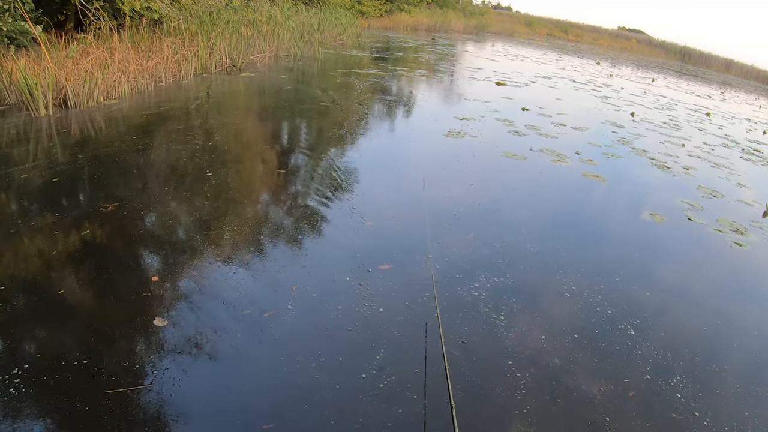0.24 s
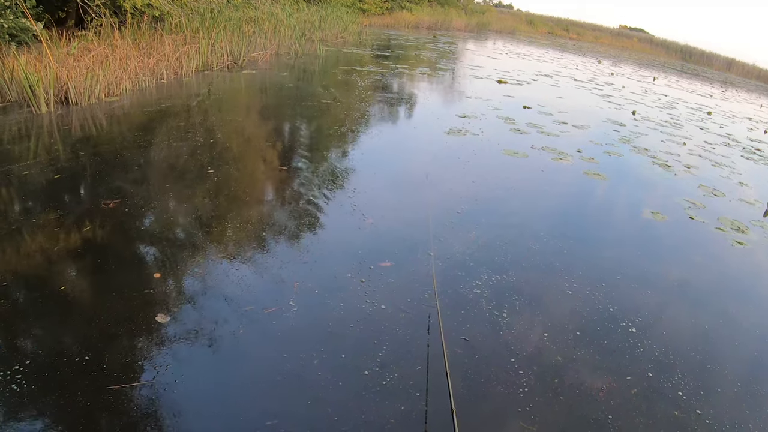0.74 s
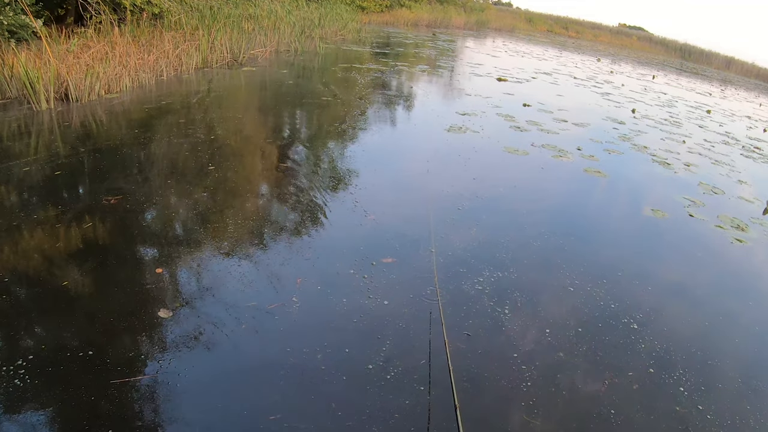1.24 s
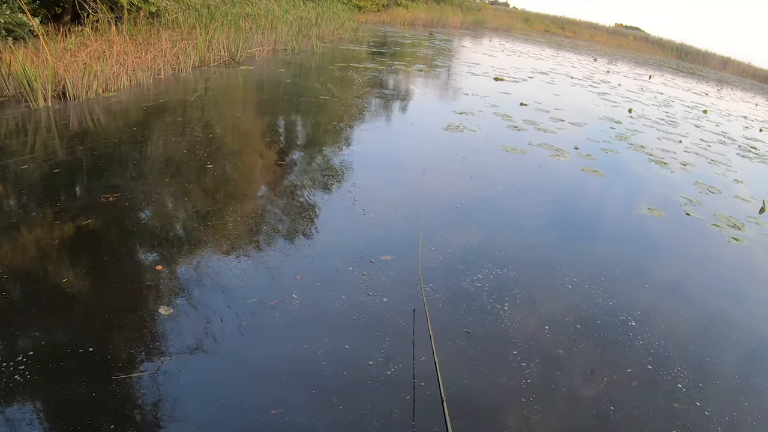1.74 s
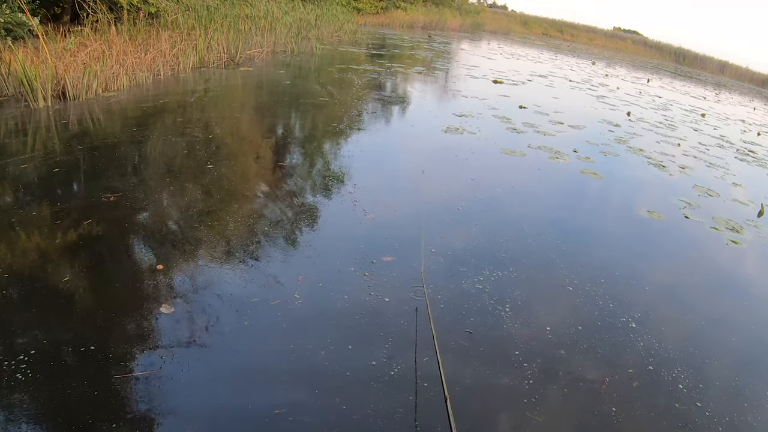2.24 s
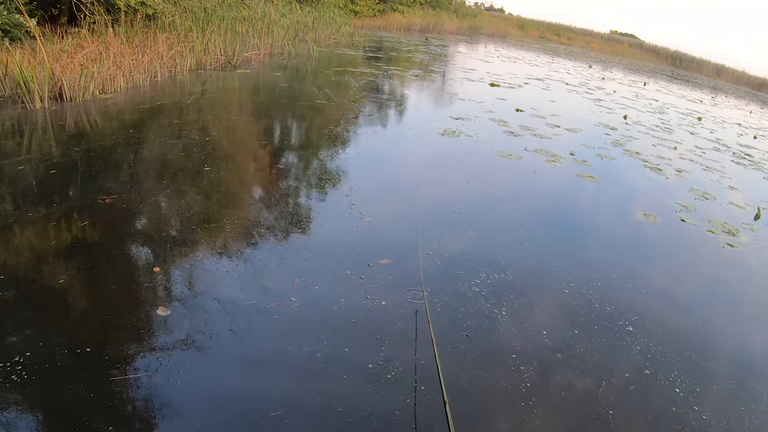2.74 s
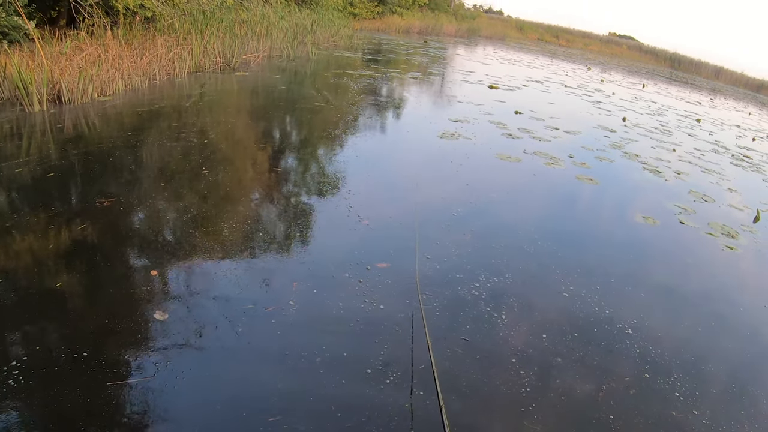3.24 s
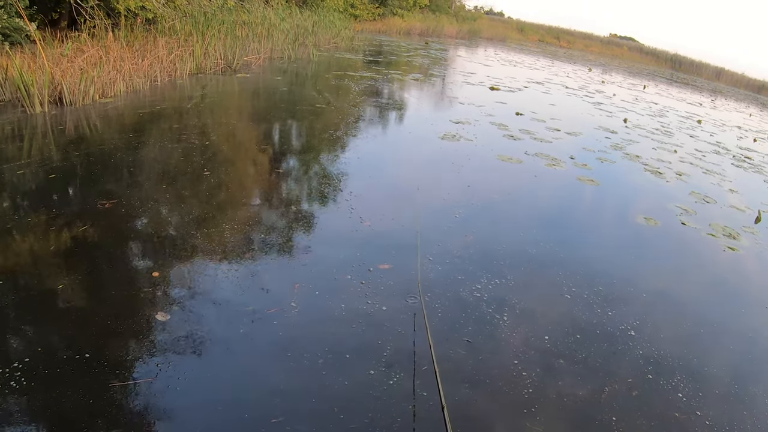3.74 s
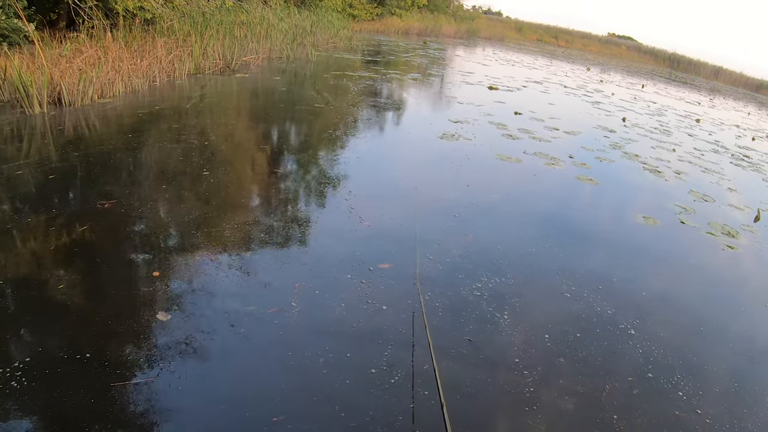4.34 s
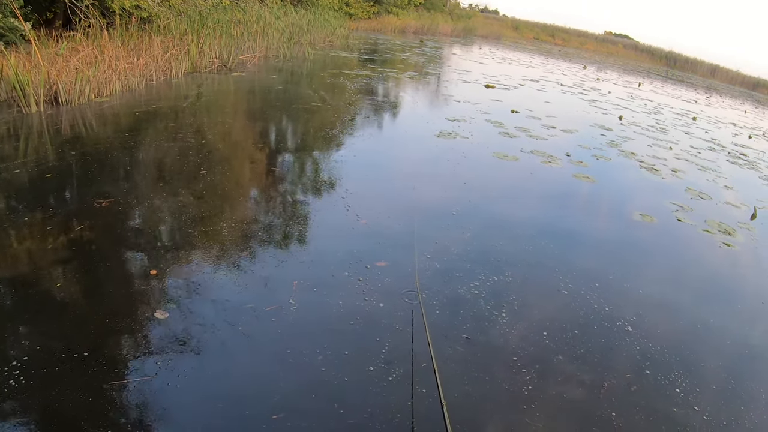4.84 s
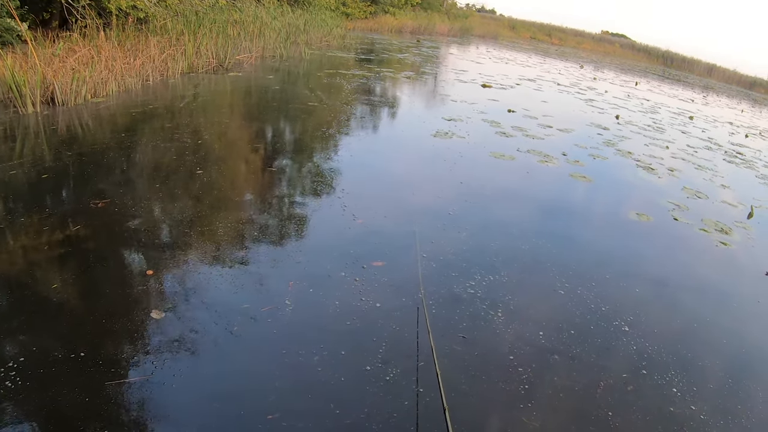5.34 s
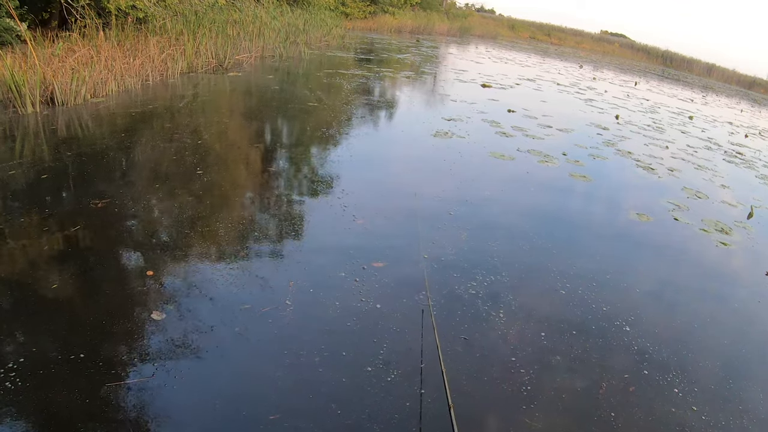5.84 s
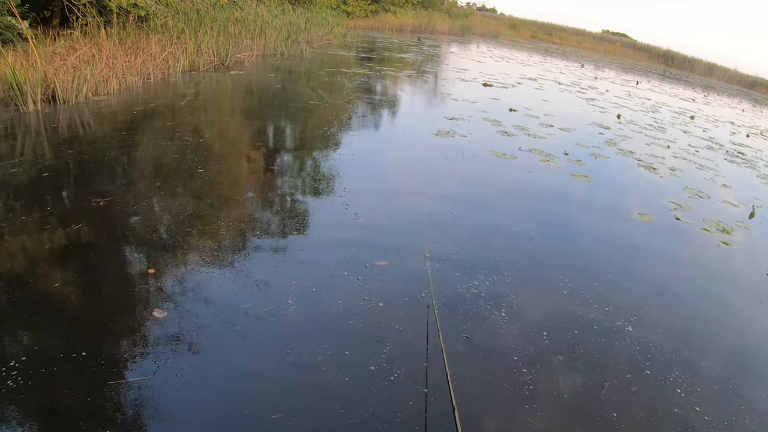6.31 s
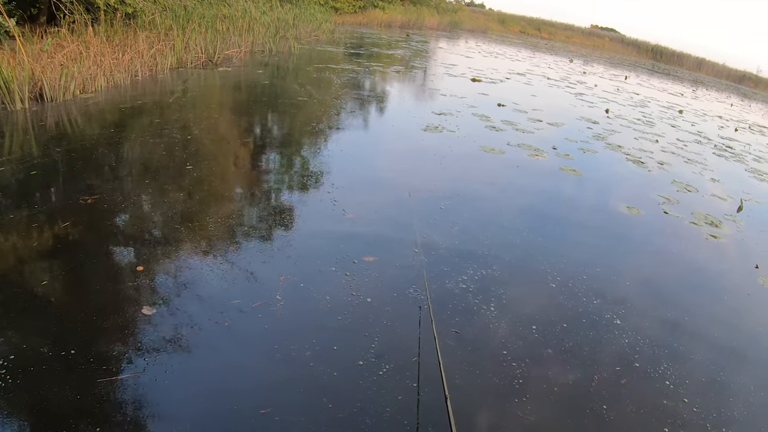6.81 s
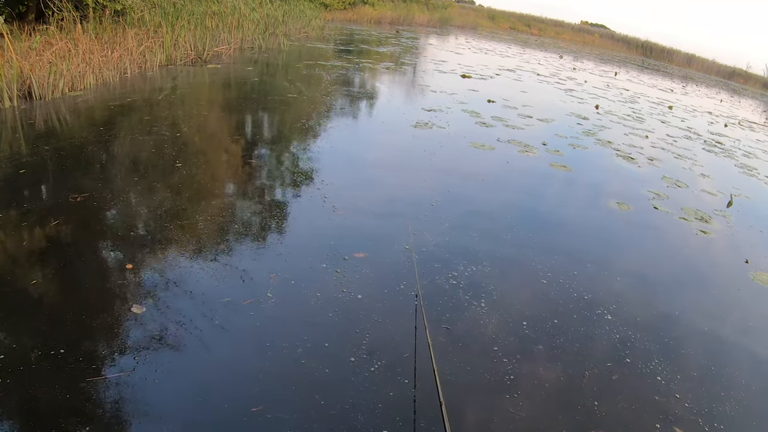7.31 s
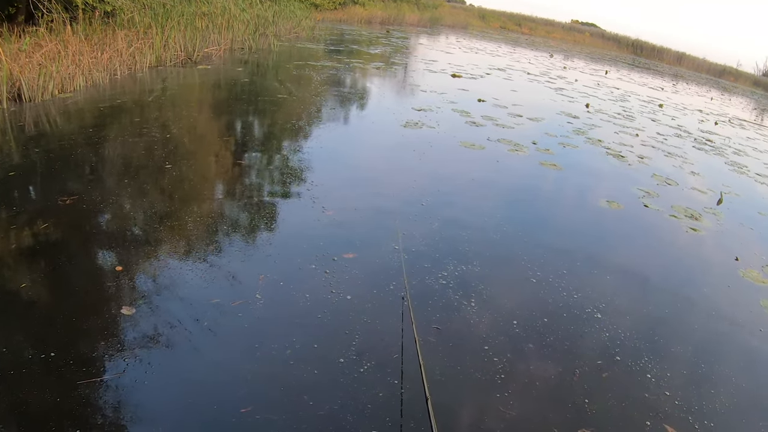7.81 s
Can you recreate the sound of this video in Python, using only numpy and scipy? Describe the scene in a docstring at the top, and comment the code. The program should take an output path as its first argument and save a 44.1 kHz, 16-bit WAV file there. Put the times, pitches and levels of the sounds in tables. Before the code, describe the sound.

Evening marsh insects shimmer and chirp steadily, a rasping falling call recurs, frog peeps and bird chips dot the calm, and wind briefly buffets the left.

```python
"""Evening marsh from the water.

Ground crickets trill without pause over two noise bands of far insects. Bush crickets, a mole cricket
and a falling, pulsed chirp are wing-stroke-gated tones, scattered by reeds and trees. Frog peeps and bird
chips are swept sines; a bird's scolds are shaped noise, tackle ticks band-passed bursts.
Far traffic, a machine hum and breeze lie behind; one puff of wind hits the left microphone port.
"""
import sys
import numpy as np
from scipy import signal
from scipy.fft import rfft, irfft, next_fast_len
from scipy.io import wavfile

SR = 44100
rng = np.random.default_rng(int(sys.argv[2]) if len(sys.argv) > 2 else 0)


def wrap_up_sound(samples):
    """Save the sound to the file named by the first command line argument, as 16-bit audio."""
    columns = np.atleast_2d(samples).T
    # keep every value between -1 and 1, then stretch to whole-number steps
    tamed = np.clip(columns, -1, 1)
    steps = np.round(tamed * 32767).astype(np.int16)
    wavfile.write(sys.argv[1], SR, steps)


N = 355875
T = np.arange(N) / SR
TOP_HZ = 9700

# pan_db is left minus right; echo_db is scatter relative to the direct sound

# ground cricket trills: strokes_per_s, top_pitch_hz, stroke_end_sag_hz, level_db, pan_db, echo_db
GROUND_TRILLS = [(40.9, 8370, 700, -54.5, 4.5, -8.5), (39.37, 7888, 70, -54, 2, -1),
                 (39.75, 8350, 200, -60.5, -1.5, -1), (32, 6720, 400, -57, 0, 0.5),
                 (46.9, 5270, 160, -65.5, 3, 4)]

# bush crickets by name: pitch_hz, start_rise_hz, length_s, pan_db, echo_db
BUSH_SINGERS = {"high": (4860, 70, .28, 7.9, -6), "left": (4480, 10, .33, 6, -6),
                "ahead": (4515, 25, .32, 2.3, -5), "low": (4390, 60, .29, 1, 1),
                "back": (4580, 50, .29, 1, 1), "gruff": (4190, 250, .16, 1, 3)}
# bush cricket chirps: start_s, singer, level_db
BUSH_CHIRPS = [(.04, "low", -56), (.731, "ahead", -47.5), (1.27, "gruff", -61), (1.47, "high", -49),
               (1.899, "low", -51.5), (2.102, "back", -52), (2.41, "left", -48), (2.99, "gruff", -56),
               (3.12, "high", -49.5), (3.219, "low", -52), (3.35, "back", -55), (3.66, "left", -55),
               (4.12, "back", -54), (4.35, "ahead", -50), (4.689, "low", -52.5), (4.91, "high", -51.5),
               (5.202, "back", -56), (5.419, "left", -55.5), (5.779, "left", -61), (6.15, "ahead", -52),
               (6.24, "low", -52.5), (6.41, "back", -59), (6.78, "ahead", -54.5), (7.19, "left", -54),
               (7.551, "back", -53.5), (7.84, "left", -54)]
CHIRP_RISE_S, CHIRP_HZ_PER_STROKE_RATE = .06, 104
# fainter bush crickets deep in the reeds, at random
DEEP_GAP_S, DEEP_LENGTH_S, DEEP_HZ, DEEP_SPREAD_HZ, DEEP_DB, DEEP_PAN_DB = .9, .24, 4450, 120, -61.5, 1

# falling chirps: start_s, level_db
FALLING_CHIRPS = [(0.103, -54.5), (0.873, -52.5), (1.575, -53), (2.462, -54.5), (3.268, -53.7),
                  (4.093, -54.5), (5.03, -55.5), (5.9, -54.5), (6.994, -54.5), (7.79, -55)]
# the glide is fast at first; a lower note sets in under its end
FALL_LENGTH_S, FALL_START_HZ, FALL_END_HZ, FALL_BEND = .28, 3620, 2800, .66
LAST_DELAY_S, LAST_LENGTH_S, LAST_START_HZ, LAST_END_HZ = .212, .095, 2680, 2600
LAST_DB, FALL_PAN_DB = -1, .5
TREE_DELAY_S, TREE_ECHO_DB = .04, -5

# mole cricket, a nearly even beat with fainter answers: start_s, level_db
MOLE_CHIRPS = [(-.03, -59), (.37, -67), (.98, -56.5), (1.4, -66.5), (1.75, -57), (2.56, -60), (3.16, -66),
               (3.39, -60.5), (3.72, -69), (4.269, -59.5), (4.76, -68), (5.14, -60), (5.38, -66),
               (5.92, -59.5), (6.52, -66), (6.83, -59), (7.25, -68), (7.62, -59)]
MOLE_LENGTH_S, MOLE_HZ, MOLE_PAN_DB = .21, 1752, 7

# frog, two bouts of four: start_s, level_db
FROG_PEEPS = [(1.35, -60), (1.617, -58.5), (1.91, -59), (2.185, -60.5), (5.505, -62), (5.777, -59.5),
              (6.065, -58), (6.345, -60.5)]
PEEP_LENGTH_S, PEEP_HZ, PEEP_SLIDE_HZ, PEEP_SLIDE_S, PEEP_DROOP_HZ = .12, 2660, 319, .0172, 45

# single bird chips: start_s, length_s, start_hz, end_hz, hoarseness_hz, level_db, pan_db
BIRD_CHIPS = [(0.804, 0.028, 3060, 3240, 200, -52, -3), (2.531, .008, 3750, 2870, 120, -42, 0),
              (3.0, 0.028, 2930, 2960, 50, -58.5, -6), (3.738, 0.038, 8200, 7720, 160, -42.5, 7),
              (4.324, 0.0325, 3030, 3600, 262, -43.5, -5), (7.492, 0.012, 3800, 3720, 110, -47, 8),
              (7.682, 0.028, 3140, 3100, 240, -47, -3)]
# one quick run of rising chips
RUN_S, RUN_PERIOD_S, RUN_START_HZ, RUN_END_HZ, RUN_DB, RUN_PAN_DB = 6.88, .11, 4600, 5560, -54.5, 1
RUN_CHIP_S, RUN_HOARSE_HZ = .036, 230

# paired arched notes, right bank: start_s, level_db
NOTE_PAIRS = [(.374, -60), (1.712, -59), (3.078, -58), (4.106, -57.5), (5.918, -58), (7.468, -50.5)]
PAIR_GAP_S, ARCH_LENGTH_S, PAIR_PAN_DB = .103, .037, -20
ARCH_START_HZ, ARCH_TOP_HZ, ARCH_TOP_S = 2450, 3920, .022
# scolds of the same bird: start_s, length_s, level_db
BIRD_SCOLDS = [(.61, 0.15, -54), (1.885, 0.14, -52), (4.35, .145, -53), (6.14, 0.15, -55.5)]
# scold spectrum: frequency_hz, relative_level_db_per_hz
SCOLD_SPECTRUM = [(1500, -27), (2100, -8.5), (2600, -3.5), (3000, -1), (3500, -4.5), (4200, -9),
                  (5200, -27.5)]
SCOLD_PAN_DB = -7

# tackle ticks and knocks: start_s, level_db, low_edge_hz, high_edge_hz, decay_s, pan_db
TACKLE_TICKS = [(0.701, -51, 1500, 3000, 0.002, -13), (1.724, -52, 2000, 5200, .002, 1),
                (2.431, -43.5, 430, 1050, 0.006, -9), (3.22, -50.5, 5000, 6160, .003, 0),
                (4.214, -55, 800, 3000, .002, -8), (6.197, -44.5, 1200, 3300, 0.0009, -10),
                (7.197, -47, 750, 2100, .002, -14), (7.413, -57, 1600, 2200, .002, 2.5)]

# far insect chorus spectra: frequency_hz, relative_level_db_per_hz
CRICKET_SPECTRUM = [(1500, -26.5), (2100, -19), (3300, -16.5), (3700, -14), (3980, -6.5), (4400, -0.5),
                    (4620, -3), (4800, -10), (5100, -10.5), (5700, -33.5)]
# frequency_hz, relative_level_db_per_hz
KATYDID_SPECTRUM = [(5300, -22), (5750, -14), (6000, -7), (6250, -3), (6600, -3.5), (7000, -4),
                    (7400, -4.5), (7700, -4), (8300, -14), (8500, -27.5), (9000, -40)]

# traffic rumble spectrum: frequency_hz, relative_level_db_per_hz
RUMBLE_SPECTRUM = [(15, -29.5), (30, -17), (45, -11.5), (62, 0.5), (90, -3), (115, -4), (150, -1.5),
                   (220, -9), (260, -17), (340, -20), (420, -32), (600, -53.5), (2000, -82)]
# traffic level: time_s, level_db
TRAFFIC_LEVEL = [(0, -32.5), (.9, -34), (1.4, -34), (2.5, -32), (3.6, -33.5), (4.3, -32), (5, -33),
                 (6.2, -33), (7, -33.5)]
# far machine hum partials: frequency_hz, peak_db
HUM_PARTIALS = [(60, -47.5), (295, -54), (356, -56)]
HUM_RISE_S, HUM_RISEN_S, HUM_LULL_DB = 3.5, 4.1, -2.5
# air in the far trees, spectrum: frequency_hz, relative_level_db_per_hz
AIR_SPECTRUM = [(30, 7), (150, 10.5), (300, 6), (450, -1.5), (580, -2), (790, 5), (1000, -3.5), (1300, -4),
                (1600, -7), (2100, -13.5), (3400, -16.5), (5500, -12.5), (8500, -18), (9300, -37),
                (11000, -49)]
BREEZE_DB, BREEZE_LULL_DB, BREEZE_STEP_S = -48, -1.6, 1.6

# wind on the microphone, spectrum: frequency_hz, relative_level_db_per_hz
WIND_SPECTRUM = [(10, -8), (25, -2.5), (45, -2.5), (80, -4.5), (130, -12), (250, -41.5), (600, -78.5)]
STIR_DB, STIR_PAN_DB = -51.5, 2.5
PUFF_S, PUFF_ATTACK_S, PUFF_HOLD_S, PUFF_RELEASE_S, PUFF_DB, PUFF_PAN_DB = 4.858, .21, .22, .19, -23.5, 14.5
WAKE_S, WAKE_DB = .7, -30.5


def undb(db):
    """Decibels to gain."""
    return 10 ** (np.asarray(db) / 20)


def unit(x):
    """Scale each channel to rms 1."""
    return x / np.sqrt(np.mean(x ** 2, axis=-1, keepdims=True))


def pan(db):
    """Left and right gains of constant power."""
    gains = undb(np.array([[db], [-db]]) / 2)
    return gains / np.sqrt(np.mean(gains ** 2))


def walk(rate_hz, size=N):
    """Random values joined by straight lines, with a spread near 1."""
    knots = rng.standard_normal(int(size / SR * rate_hz) + 2)
    return 1.2 * np.interp(np.arange(size) / SR * rate_hz, np.arange(len(knots)), knots)


def noise(spectrum, correlation):
    """Stereo noise of a given spectrum and left-right correlation, each channel at rms 1."""
    hz, db = np.transpose(spectrum)
    size = next_fast_len(N)
    bins_hz = np.arange(size // 2 + 1) * SR / size
    colour = undb(np.interp(np.log(bins_hz + 1), np.log(hz), db))
    white = rng.standard_normal((2, size))
    mid, side = irfft(rfft(white) * colour, size)[:, :N]
    c = np.clip(correlation, -1, 1)
    return unit(np.sqrt(1 + c) * mid + np.sqrt(1 - c) * side * np.array([[1], [-1]]))


def cycles(hz):
    """Turns completed at a changing frequency."""
    return np.cumsum(hz) / SR


def tone(hz):
    """A sine at a changing frequency."""
    return np.sin(2 * np.pi * cycles(hz))


def arch(u):
    """Half a sine between 0 and 1, silent outside."""
    return np.maximum(np.sin(np.pi * np.clip(u, 0, 1)), 0)


def progress(length_s):
    """0 to 1 over a call."""
    return np.linspace(0, 1, int(length_s * SR))


def ramp(start_s, length_s):
    """0 before the start, then a linear rise to 1."""
    return np.clip((T - start_s) / length_s, 0, 1)


def add(out, start_s, sound):
    """Mix a sound in; it may have begun before the scene."""
    start = int(start_s * SR)
    part = sound[:, max(-start, 0):max(N - start, 0)]
    start = max(start, 0)
    out[:, start:start + part.shape[1]] += part


def wings(hz, rate_hz, duty, sag_hz, rough, uneven=.006, skew=1):
    """Each closing stroke drags a scraper over a file; pitch sags where the wing is slow, skew > 1 peaks late."""
    size = len(hz)
    phase = cycles(rate_hz * (1 + uneven * walk(12, size))) % 1
    stroke = phase / np.clip(duty, .1, 1)
    speed = arch(stroke ** skew)
    # uneven teeth roughen the pitch
    pitch_hz = hz - sag_hz * (1 - speed) + rough * hz * walk(500, size)
    stroke_gain = undb(1.1 * walk(rate_hz, size))
    return np.sqrt(speed) * stroke_gain * tone(pitch_hz)


def reeds(x, echo_db, t60_s):
    """Direct sound plus dense scatter from reeds and trees, different at each port; energy kept at rms 1."""
    t = np.arange(int(SR / 2)) / SR
    scatter = unit(rng.standard_normal((2, len(t))) * np.exp(-np.log(1000) * t / t60_s))
    response = scatter * undb(echo_db) / np.sqrt(len(t))
    response[:, 0] += 1
    y = signal.fftconvolve(x[None], response, axes=1)
    return y / np.sqrt(np.sum(y ** 2, axis=1, keepdims=True) / len(x))


def ports(x, pan_db, lag_samples):
    """A source off to the side is louder at one port; the right port hears it later by the lag."""
    return np.array([x[0], np.roll(x[1], lag_samples)]) * pan(pan_db)


def ground_crickets():
    """Unbroken fast trills; each wing stroke is a little arch in pitch."""
    out = 0
    for rate_hz, hz, sag_hz, db, pan_db, echo_db in GROUND_TRILLS:
        pitch_hz = hz * (1 + .0022 * walk(8))
        song = wings(pitch_hz, rate_hz, duty=.55, sag_hz=sag_hz, rough=.002984, skew=1.7)
        scattered = reeds(song, echo_db, t60_s=.18)[:, :N]
        out = out + ports(scattered, pan_db, lag_samples=2) * undb(db)
    return out


def bush_chirp(hz, rise_hz, length_s, pan_db, echo_db):
    """Uneven strokes climb to pitch and tail off; a faster wing raises both pitch and stroke rate."""
    u = progress(length_s)
    drift = 1 + .002 * walk(25, len(u))
    pitch_hz = hz * drift - rise_hz * np.exp(-u * length_s / CHIRP_RISE_S)
    rate_hz = hz / CHIRP_HZ_PER_STROKE_RATE
    song = wings(pitch_hz, rate_hz, duty=.66, sag_hz=110, rough=.006, uneven=.05) * arch(u ** .9) ** .2
    return ports(reeds(song, echo_db, t60_s=.7), pan_db, lag_samples=round(pan_db / 4.5))


def bush_crickets():
    """Six singers near by, fainter ones at random; deeper in the reeds means more scatter and no clear side."""
    out = np.zeros((2, N))
    for start_s, singer, db in BUSH_CHIRPS:
        add(out, start_s, bush_chirp(*BUSH_SINGERS[singer]) * undb(db))
    for k, (when, detune) in enumerate(rng.uniform(size=(9, 2))):
        hz = DEEP_HZ + DEEP_SPREAD_HZ * (2 * detune - 1)
        chirp = bush_chirp(hz, 90, DEEP_LENGTH_S, DEEP_PAN_DB, echo_db=.5)
        add(out, (k + when / 2) * DEEP_GAP_S, chirp * undb(DEEP_DB))
    return out


def from_ahead(song):
    """A far call from straight ahead, nearly the same at both ports; the tree line answers a moment later."""
    out = np.zeros((2, len(song) + SR))
    for delay_s, db, t60_s, width in [(0, 0, .25, .12), (TREE_DELAY_S, TREE_ECHO_DB, .7, .22)]:
        mid, side = reeds(song, echo_db=-1, t60_s=t60_s)
        add(out, delay_s, (mid + width * side * np.array([[1], [-1]])) * undb(db))
    return out * pan(FALL_PAN_DB)


def falling_chirps():
    """Rasping pulses sweep down about half an octave in all, ending on a few slower, purer low pulses."""
    out = np.zeros((2, N))
    u, v = progress(FALL_LENGTH_S), progress(LAST_LENGTH_S)
    glide_hz = FALL_START_HZ + (FALL_END_HZ - FALL_START_HZ) * u ** FALL_BEND
    last_hz = LAST_START_HZ + (LAST_END_HZ - LAST_START_HZ) * v
    for start_s, db in FALLING_CHIRPS:
        rate_hz = 60 + 2 * rng.standard_normal()
        glide = wings(glide_hz, rate_hz, duty=.8, sag_hz=150.1, rough=.036) * arch(u ** .85) ** .36
        last = wings(last_hz, 31, duty=.8, sag_hz=114, rough=.014) * arch(v) ** .11
        add(out, start_s, from_ahead(glide) * undb(db))
        add(out, start_s + LAST_DELAY_S, from_ahead(last) * undb(db + LAST_DB))
    return out


def mole_cricket():
    """Low, burry chirps from the left bank, each stroke a small sweep, blurred by distance."""
    out = np.zeros((2, N))
    u = progress(MOLE_LENGTH_S)
    for start_s, db in MOLE_CHIRPS:
        song = wings(MOLE_HZ + 20 * u, 42, duty=.8, sag_hz=80, rough=.035) * arch(u) ** .21
        add(out, start_s, reeds(song, echo_db=2.5, t60_s=.32) * undb(db) * pan(MOLE_PAN_DB))
    return out


def frog():
    """Pure peeps that slide up as they swell, then droop a little and fade."""
    out = np.zeros((2, N))
    u = progress(PEEP_LENGTH_S)
    slide_hz = PEEP_SLIDE_HZ * np.exp(-u * PEEP_LENGTH_S / PEEP_SLIDE_S)
    song = tone(PEEP_HZ - slide_hz - PEEP_DROOP_HZ * u ** 3) * arch(u) ** .4
    for start_s, db in FROG_PEEPS:
        add(out, start_s, reeds(song, echo_db=-11, t60_s=.3) * undb(db) * pan(-6.5))
    return out


def chip(length_s, start_hz, end_hz, hoarse_hz):
    """One quick sweep, hoarse from fast pitch jitter."""
    u = progress(length_s)
    jitter_hz = hoarse_hz * walk(1200, len(u))
    song = tone(start_hz + (end_hz - start_hz) * u + jitter_hz) * arch(u) ** .26
    return reeds(song, echo_db=-5, t60_s=.25)


def birds(run_count=5):
    """Scattered single chips and one evenly spaced run, its chips varying in pitch and level."""
    out = np.zeros((2, N))
    for start_s, length_s, start_hz, end_hz, hoarse_hz, db, pan_db in BIRD_CHIPS:
        add(out, start_s, chip(length_s, start_hz, end_hz, hoarse_hz) * undb(db) * pan(pan_db))
    for k, (detune, effort) in enumerate(rng.standard_normal((run_count, 2))):
        shift_hz, db = 70 * detune, RUN_DB + 1.2 * effort
        sound = chip(RUN_CHIP_S, RUN_START_HZ + shift_hz, RUN_END_HZ + shift_hz, RUN_HOARSE_HZ)
        add(out, RUN_S + k * RUN_PERIOD_S, sound * undb(db) * pan(RUN_PAN_DB))
    return out


def bank_bird():
    """One bird close on the right: paired clean notes shoot up and hook over; scolds are breathy noise."""
    out = np.zeros((2, N))
    u = progress(ARCH_LENGTH_S)
    hz = ARCH_TOP_HZ - (ARCH_TOP_HZ - ARCH_START_HZ) * (1 - u * ARCH_LENGTH_S / ARCH_TOP_S) ** 2
    note = tone(hz + 90 * walk(900, len(u))) * arch(u ** 1.3) ** 1.1
    for start_s, db in NOTE_PAIRS:
        for after_s in (0, PAIR_GAP_S):
            sound = reeds(note, echo_db=-7, t60_s=.2)
            add(out, start_s + after_s, sound * undb(db) * pan(PAIR_PAN_DB))
    envelope = sum(undb(db) * arch((T - start_s) / length_s) ** .2 for start_s, length_s, db in BIRD_SCOLDS)
    flutter = undb(1.5 * walk(150))
    return out + noise(SCOLD_SPECTRUM, correlation=0) * envelope * flutter * pan(SCOLD_PAN_DB)


def tackle():
    """Small ticks and knocks of fishing tackle, each a dying noise burst through one broad resonance."""
    out = np.zeros((2, N))
    t = np.arange(int(SR * .015)) / SR
    for start_s, db, low_hz, high_hz, decay_s, pan_db in TACKLE_TICKS:
        burst = rng.standard_normal(len(t)) * np.exp(-t / decay_s)
        resonance = signal.butter(2, [low_hz, high_hz], "band", fs=SR, output="sos")
        tick = signal.sosfilt(resonance, burst)
        add(out, start_s, reeds(tick, echo_db=-8, t60_s=.18) * undb(db) * pan(pan_db))
    return out


def chorus():
    """Countless far singers merged into two shimmering noise bands."""
    cricket_shimmer = undb(.25 * walk(5) + 1.1 * walk(80))
    katydid_shimmer = undb(.24 * walk(2.1) + .31 * walk(110))
    crickets = noise(CRICKET_SPECTRUM, correlation=.62) * cricket_shimmer
    katydids = noise(KATYDID_SPECTRUM, correlation=-.16) * katydid_shimmer
    return crickets * undb(-52.5) * pan(1.4) + katydids * undb(-48.5) * pan(3.7)


def distance():
    """Traffic rumble, a wavering machine hum that comes up a little, and air in the far trees."""
    traffic_db = np.interp(T, *np.transpose(TRAFFIC_LEVEL)) + .5 * walk(5)
    rumble = noise(RUMBLE_SPECTRUM, correlation=1) * undb(traffic_db)
    hum = sum(undb(db + 3.5 * walk(4)) * tone(hz * (1 + .00785 * walk(9))) for hz, db in HUM_PARTIALS)
    hum = hum * undb(np.interp(T, [HUM_RISE_S, HUM_RISEN_S], [HUM_LULL_DB, 0]))
    # the breeze steps up once and stays
    breeze_db = BREEZE_DB + np.where(T > BREEZE_STEP_S, 0, BREEZE_LULL_DB)
    air = noise(AIR_SPECTRUM, correlation=-.2) * undb(breeze_db) * pan(-3.5)
    return ports(rumble + hum, 0, lag_samples=1) + air


def wind():
    """Faint stirring air at the ports; one puff with a fading wake buffets the left, barely the right."""
    drop_s = PUFF_S + PUFF_ATTACK_S + PUFF_HOLD_S
    puff = undb(PUFF_DB) * (1 - ramp(drop_s, PUFF_RELEASE_S))
    wake = undb(WAKE_DB) * np.exp(-np.maximum(T - drop_s, 0) / WAKE_S)
    gust = ramp(PUFF_S, PUFF_ATTACK_S) * (puff + wake) * undb(2 * walk(13))
    stir = undb(STIR_DB) * pan(STIR_PAN_DB)
    return noise(WIND_SPECTRUM, correlation=0) * (stir + gust * pan(PUFF_PAN_DB))


def scene():
    """Sum of all sources around the marsh."""
    insects = ground_crickets() + bush_crickets() + falling_chirps() + mole_cricket() + chorus()
    return insects + frog() + birds() + bank_bird() + tackle() + distance() + wind()


def record(dry):
    """Steep elliptic low-pass that cuts the top."""
    return signal.sosfilt(signal.ellip(8, .2, 70, TOP_HZ, fs=SR, output="sos"), dry)


dry = scene()
out = record(dry)
wrap_up_sound(out)
```